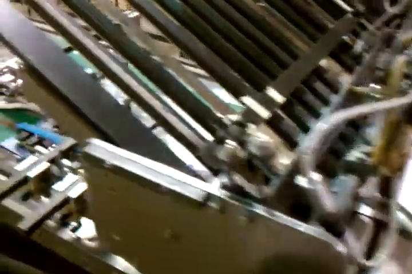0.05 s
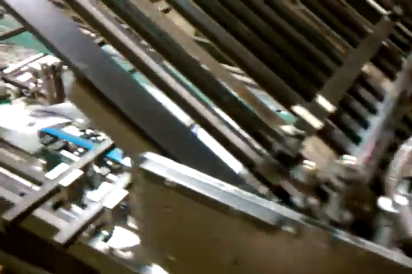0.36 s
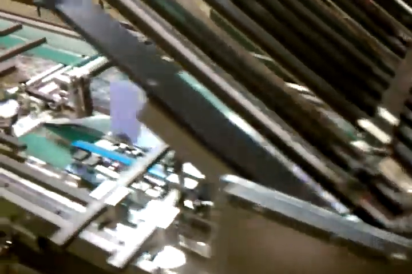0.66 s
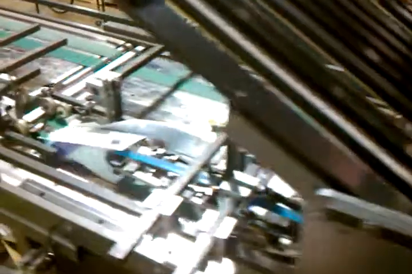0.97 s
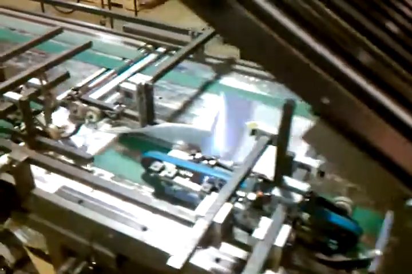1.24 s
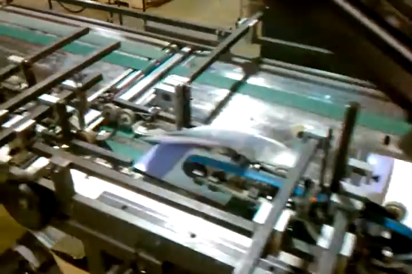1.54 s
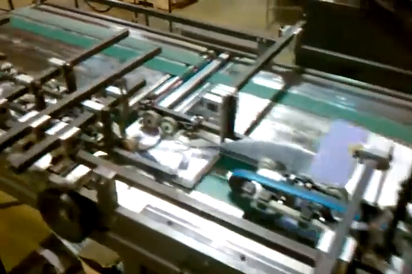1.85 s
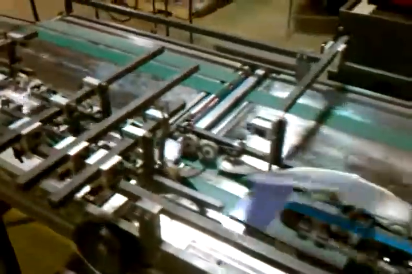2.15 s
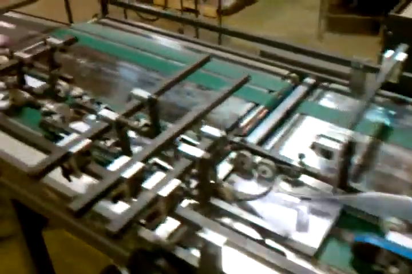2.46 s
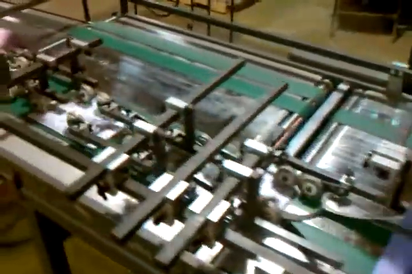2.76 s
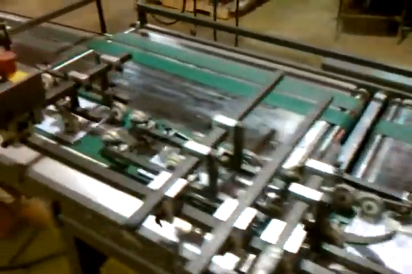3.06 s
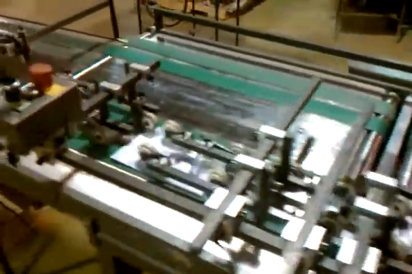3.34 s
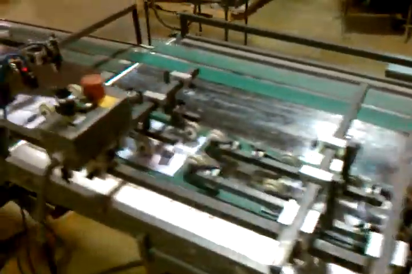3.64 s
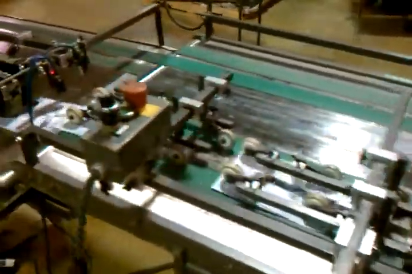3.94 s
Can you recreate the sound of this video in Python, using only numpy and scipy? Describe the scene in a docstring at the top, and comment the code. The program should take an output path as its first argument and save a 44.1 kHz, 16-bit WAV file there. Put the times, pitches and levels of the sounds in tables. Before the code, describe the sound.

A carton folding machine runs in a workshop, its belts rushing, rollers chattering and squealing, and gears whining. Sharp clacks, card swishes and snaps repeat steadily, loud and close at first, then softer as the microphone moves along.

```python
"""A carton folding and gluing machine runs in a workshop. From the start, belts rush, rollers
chatter and squeal, gears whine and a motor hums. Every two thirds of a second a flat card goes through:
its edge ticks on a guide, there is a dull knock, a folding hook lands with a rattling clack, the card
swishes under a bar and a flap snaps down. The first, nearest clacks overload the microphone;
then it drifts away along the line and the clacks grow quieter."""
import sys
import numpy as np
from scipy import signal
from scipy.io import wavfile

SR = 44100
rng = np.random.default_rng(int(sys.argv[2]) if len(sys.argv) > 2 else 0)


def unload_audio(sound):
    """Save the sound as a 16-bit wav file, at the path given as the first command line argument."""
    columns = np.transpose(np.atleast_2d(sound))
    # keep every value between -1 and 1, then stretch to whole-number steps
    steps = np.round(np.clip(columns, -1, 1) * 32767)
    wavfile.write(sys.argv[1], SR, steps.astype(np.int16))


N = 176400
T = np.arange(N) / SR


# The notes the folding hook rings with: pitch_hz, width_hz, relative_db
HOOK_BODY = [(615, 430, -8.5), (1014, 360, -2.5), (1820, 430, 1), (2263, 330, 1.5), (2615, 275, 1),
             (4200, 1600, -23)]
# Each strike of the hook: start_s, level_db, rattle_db, pitch_ratio
HOOK_STRIKES = [(0.1298, -3, -13, 0.96), (0.7939, -3.5, -25, 0.99), (1.4687, -5, -25, 1.067),
                (2.138, -9, -19, 0.906), (2.8084, -11, -17.5, .98), (3.4789, -12, -17, 0.96)]
def hook_clack(start_s, level_db, rattle_db, pitch_ratio):
    """The hook lands hard, grinds for a moment and rattles."""
    body = pitched(HOOK_BODY, pitch_ratio)
    hit = [(start_s, level_db)]
    grind = contacts(hit, body, attack_s=0.0011, hold_s=0.0026, decay_s=0.0033, grain=0.11)
    rattle = contacts([(start_s, rattle_db)], body, attack_s=0.00092, hold_s=0.015, decay_s=0.02, grain=1)
    return impacts(hit, body) + grind + rattle


# Each bounce of the hook: start_s, level_db
HOOK_BOUNCES = [(.1612, -8.5), (.8122, -10), (.8248, -15), (1.476, -17), (2.157, -19), (2.175, -17),
                (2.8135, -18.5), (3.275, -16), (3.494, -18)]
def hook_bounces():
    """The hook bounces back after a strike and rings again, more softly."""
    grind = contacts(HOOK_BOUNCES, HOOK_BODY, attack_s=0.00072, hold_s=0.0012, decay_s=0.0022, grain=0.38)
    return impacts(HOOK_BOUNCES, HOOK_BODY) + grind


# The notes a flap rings with: pitch_hz, width_hz, relative_db
FLAP_BODY = [(1430, 560, -2.5), (2470, 550, 1.5), (3560, 1300, -5.5), (4800, 1300, -7), (5840, 900, -5)]
# Each snap of a flap: start_s, level_db, pitch_ratio
FLAP_SNAPS = [(.032, -8.5, 1.12), (0.492, -9, 1), (1.1566, -10.5, 1.08), (1.8297, -10.5, 1.06),
              (2.5016, -7.5, 0.86), (3.168, -12, 0.95), (3.8397, -11.5, 1.02)]
def flap_snap(start_s, level_db, pitch_ratio):
    """A flap slaps down and stops at once."""
    body = pitched(FLAP_BODY, pitch_ratio)
    hit = [(start_s, level_db)]
    slap = contacts(hit, body, attack_s=0.0019, hold_s=0.0029, decay_s=0.0018, grain=0.24)
    return impacts(hit, body) + slap


# The tone of sliding card: pitch_hz, width_hz, relative_db
SWISH_BODY = [(1400, 1150, 2.8), (2200, 1080, 3), (3880, 860, -0.5), (6180, 220, -3)]
# Each slide: start_s, level_db
SWISHES = [(.318, -10), (.996, -12), (1.660, -12.5), (2.338, -18), (3.003, -11), (3.683, -14.5)]
def card_swishes():
    """Card rubs as it slides under the folding bar."""
    return contacts(SWISHES, SWISH_BODY, attack_s=0.0036, hold_s=0.0033, decay_s=0.025, grain=0.73)


# The high notes of a tick: pitch_hz, width_hz, relative_db
TICK_BODY = [(3670, 2000, -1.5), (5200, 94, 9), (6380, 1700, 0.5)]
# Each tick: start_s, level_db
TICKS = [(.030, -18), (.103, -18), (.698, -13.5), (.768, -16), (1.227, -17), (1.369, -16), (1.498, -23),
         (1.664, -20), (2.040, -18), (2.340, -15.5), (2.708, -17)]
def edge_ticks():
    """The edge of the card taps a guide."""
    return contacts(TICKS, TICK_BODY, attack_s=0.0018, hold_s=0.0025, decay_s=0.0036, grain=0.43)


# The mostly low notes of a knock: pitch_hz, width_hz, relative_db
KNOCK_BODY = [(260, 230, 7), (660, 1100, -8), (1700, 630, -9), (5500, 2400, -14)]
# Each knock: start_s, level_db
KNOCKS = [(.103, -20), (.767, -22), (.821, -15.5), (1.255, -18.5), (1.441, -18.5), (2.111, -24),
          (2.780, -20), (3.451, -20.5)]
def dull_knocks():
    """Short, dull bumps sound around the clacks."""
    return contacts(KNOCKS, KNOCK_BODY, attack_s=0.0024, hold_s=0.0024, decay_s=0.005, grain=0.51)


# How strong the belts and rollers are from low to high: pitch_hz, relative_db
BELT_TONE = [(25, -36), (40, -23), (52, -8.5), (80, -6), (140, -5), (240, -3.5), (400, -4), (600, -5.5),
             (900, -2), (1400, -1.5), (1950, 1.6), (2500, -6), (3100, -8.5), (3700, -6.5), (5000, -7),
             (6600, -9.5), (8500, -10)]
def belts(swings_db, level_db=-19.5, flutter_db=0.89, flutter_per_s=20):
    """Belts rush over their rollers, every band of the noise fluttering a little."""
    edges_hz = 22 * 2 ** (np.arange(27) / 3)  # three bands to an octave
    noise = rng.standard_normal((2, N))
    shared_flutter = 0.72 * drift(flutter_per_s)
    rush, power = 0, 0
    for k, (low, high) in enumerate(zip(edges_hz, edges_hz[1:])):
        hz = np.sqrt(low * high)
        band_filter = signal.butter(2, [low, high], "band", fs=SR, output="sos")
        band = from_db(at_hz(BELT_TONE, hz)) * signal.sosfilt(band_filter, noise[k % 2])
        power += np.mean(band ** 2)
        flutter = flutter_db * (shared_flutter + drift(flutter_per_s))
        rush += band * from_db(nearness(hz, swings_db) + flutter)
    return from_db(level_db) * rush / np.sqrt(power)


def roller_chatter(swing_db, level_db=-30, clicks_per_s=700, spread_db=3.5, ring_cycles=17.4):
    """Rollers and guides click at random, each part at its own pitch."""
    pitches = np.geomspace(260, 6600, 30)
    sizes = from_db(spread_db * np.minimum(rng.exponential(1, N), 4.5)) * rng.choice([-1, 1], N)
    clicks = sizes * (rng.random(N) < clicks_per_s / SR)
    part = rng.integers(0, len(pitches), N)
    rings = 0
    for k, hz in enumerate(pitches):
        width_hz = np.log(1000) / np.pi * hz / ring_cycles  # fades 60 dB in ring_cycles
        rings += from_db(at_hz(BELT_TONE, hz)) * resonate(clicks * (part == k), hz, width_hz)
    return from_db(level_db + swing_db) * rms_one(rings)


# The path of the roller's squeal: time_s, pitch_hz, level_db
SQUEAL = [(0, 1964, -38), (.65, 1925, -31), (.96, 1960, -29), (1.08, 1930, -31), (1.2, 2020, -24),
          (1.33, 2022, -41), (1.55, 2042, -33), (2.22, 1970, -33.5), (2.41, 2060, -30.5), (2.47, 2003, -29),
          (2.58, 2027, -31), (2.72, 1983, -28), (2.8, 2032, -44), (2.95, 1890, -43), (3.7, 1874, -37),
          (4, 1885, -29)]
def roller_squeal(jitter_hz=14.64, jitter_per_s=21.9):
    """A rubbed metal roller sings at an unsteady pitch."""
    hz, db = in_time(SQUEAL)
    phase = phase_of(hz + jitter_hz * drift(jitter_per_s))
    return from_db(db) * rms_one(np.sin(phase) * wobble(0.5, jitter_per_s))


# How the rail's note swells and fades: time_s, level_db
RAIL_LEVELS = [(0, -47), (1.3, -30.5), (1.55, -38), (2.05, -28.5), (2.3, -40), (2.68, -31), (3.1, -39),
               (3.3, -35), (3.52, -31), (3.7, -41)]
def guide_rail():
    """A guide rail sings as the belt rubs it."""
    level_db, = in_time(RAIL_LEVELS)
    return from_db(level_db) * wavering_tone(hz=1417, width_hz=38)


# The gear's side tones: cycles_per_turn, level_db
GEAR_TONES = [(11, -48), (24, -44.5), (25, -44.5), (27, -40), (29, -40), (31, -41), (33, -41.5), (36, -39)]
# The main tone, made by teeth meeting: time_s, level_db
TOOTH_LEVELS = [(0, -39), (.7, -26), (.92, -34), (2.3, -37.5), (2.5, -40), (3.05, -30.5), (3.3, -37.5),
                (4, -35)]
def gear_whine(turns_per_s=46, teeth=30):
    """Gear teeth meet in a steady whine, with side tones at other multiples of the turning rate."""
    turn = phase_of(turns_per_s * wobble(0.001623, 2.56))
    side_tones = 0
    for cycles, db in GEAR_TONES:
        side_tones += from_db(db) * np.sin(cycles * turn + rng.uniform(0, 2 * np.pi)) * wobble(0.51, 7.7)
    tooth_db, = in_time(TOOTH_LEVELS)
    tooth_tone = from_db(tooth_db) * np.sin(teeth * turn) * wobble(0.18, 8)
    return np.sqrt(2) * (side_tones + tooth_tone)


# The motor's three tones along the line: time_s, first_db, second_db, third_db
MOTOR_LEVELS = [(0, -43.5, -35.5, -32), (.7, -42.5, -32.5, -40), (1.35, -39.5, -35, -42),
                (1.7, -45.5, -39.5, -39), (2.0, -36, -35.5, -39), (2.3, -48.5, -42.5, -39.5),
                (3.1, -39.5, -44, -49), (3.55, -38.5, -34.5, -45.5), (4, -41, -35, -41)]
def motor_hum(pitch_hz=116.1):
    """The motor hums roughly at one, two and three times its lowest pitch."""
    phase = phase_of(pitch_hz * wobble(0.012, 4.65))
    hum = 0
    for k, db in enumerate(in_time(MOTOR_LEVELS), 1):
        tone = np.sin(k * phase + rng.uniform(0, 2 * np.pi))
        hum += from_db(db) * rms_one(tone * wobble(0.52, 14))
    return hum


# Steady low hums: pitch_hz, level_db, width_hz
LOW_HUMS = [(191.7, -46, 6.2), (276, -41, 8.9), (463, -43.5, 9.5), (686, -43.5, 7.6)]
# The high notes of the bearings: pitch_hz, level_db, width_hz
BEARING_WHINES = [(2612, -40, 1.2), (3421, -50, 7), (5638, -49, 4), (5868, -50, 4)]
def hums_and_bearings():
    """A few low notes hum steadily and the bearings whine faintly."""
    return sum(from_db(db) * wavering_tone(hz, width) for hz, db, width in LOW_HUMS + BEARING_WHINES)


def workshop_echo(sound, level_db=-8, fade_s=0.16):
    """Sound bounces off the walls and the machine's frame, blurring into a short tail."""
    age = T[:SR]
    tail = rng.standard_normal(SR) * from_db(-60 * age / fade_s) * (age > 0.004)
    return from_db(level_db) * signal.fftconvolve(sound, tail / np.sqrt(np.sum(tail ** 2)))[:N]


def impacts(rows, body, touch_s=0.0003, peak_boost_db=2.5):
    """Each hard touch is one short push that sets a body ringing."""
    blow = ring(np.exp(-T[:SR // 10] / touch_s), body)
    pushes = np.zeros(N)
    for start_s, db in rows:
        pushes[int(start_s * SR)] = from_db(db + peak_boost_db)
    return signal.fftconvolve(pushes, blow / np.abs(blow).max())[:N]


def contacts(rows, body, attack_s, hold_s, decay_s, grain):
    """Bursts of tiny slips rise, hold and die, ringing a body; more grain makes them grittier."""
    force = np.zeros(N)
    for start_s, db in rows:
        age = T - start_s
        rise = np.clip(1 + age / attack_s, 0, 1) ** 2
        fall = np.exp(-np.clip((age - hold_s) / decay_s, 0, 20))
        force += from_db(db) * rise * fall
    slips = rng.choice([-1, 1], N) * rms_one(np.exp(grain * rng.standard_normal(N)))
    return ring(force * slips, body)


def ring(force, body):
    """A force rings all the notes of a body; a noisy force keeps about the same power."""
    power = sum(from_db(db) ** 2 * np.pi * width / SR for hz, width, db in body)
    notes = [(-1) ** k * from_db(db) * resonate(force, hz, width) for k, (hz, width, db) in enumerate(body)]
    return sum(notes) / np.sqrt(power)


def resonate(force, hz, width_hz):
    """One ringing note: the wider it is, the sooner it dies."""
    r = np.exp(-np.pi * width_hz / SR)
    feedback = [1, -2 * r * np.cos(2 * np.pi * hz / SR), r * r]
    return signal.lfilter(np.array([1, 0, -1]) * (1 - r * r) / 2, feedback, force + 1e-18)


def pitched(body, ratio):
    """A body rings higher or lower depending on where it is struck."""
    return [(hz * ratio, width, db) for hz, width, db in body]


def nearness(hz, swings_db):
    """The change in level, in dB, at one pitch as the microphone moves."""
    places = np.log([110, 300, 1500, 5000])  # steady deep bass, then bass, middle, treble
    shares = [np.interp(np.log(hz), places, row) for row in np.eye(4)[1:]]
    return sum(share * swing for share, swing in zip(shares, swings_db))


def wavering_tone(hz, width_hz):
    """A tone that wavers at random, faster when it is wider."""
    phase = phase_of(np.full(N, hz))
    return drift(width_hz) * np.sin(phase) + drift(width_hz) * np.cos(phase)


def drift(per_s):
    """A smooth random curve that typically strays 1 from zero."""
    r = np.exp(-80 * np.pi * per_s / SR)
    slow = signal.lfilter([1], [1, -2 * r, r * r], rng.standard_normal(N // 40 + 2002))[2000:]
    return np.interp(np.arange(N) / 40, np.arange(len(slow)), rms_one(slow))


def wobble(depth, per_s):
    """A multiplier that wanders around 1."""
    return 1 + depth * drift(per_s)


def phase_of(hz):
    """The angle a wave has turned through so far."""
    return 2 * np.pi * np.cumsum(hz) / SR


def in_time(rows):
    """Join a table's points into one curve for each column after the time."""
    times, *columns = np.transpose(rows)
    return [np.interp(T, times, column) for column in columns]


def at_hz(rows, hz):
    """Look up the level at a pitch, spacing octaves evenly."""
    pitches, levels = np.transpose(rows)
    return np.interp(np.log(hz), np.log(pitches), levels)


def from_db(db):
    """Turn decibels into a multiplier."""
    return 10 ** (np.asarray(db) / 20)


def rms_one(x):
    """Scale to an average power of 1."""
    return x / np.sqrt(np.mean(x ** 2) + 1e-20)


# Running noise along the line (only swings from the average count): time_s, bass_db, middle_db, treble_db
RUNNING_LEVELS = [(0.0, -25, -19.5, -23), (0.44, -29, -19.5, -23), (0.79, -28.5, -19, -23),
                  (1.0, -29, -20, -23.5), (1.31, -26.5, -19.5, -22.5), (1.61, -29.5, -20.5, -24.5),
                  (3.02, -30, -23, -27.5), (3.4, -30, -23, -26), (4.0, -29, -24, -27.5)]
def scene():
    """The folding sounds and their echo, over the noise of the running machine."""
    hits = edge_ticks() + dull_knocks() + hook_bounces() + card_swishes()
    hits += sum(hook_clack(*row) for row in HOOK_STRIKES)
    hits += sum(flap_snap(*row) for row in FLAP_SNAPS)
    bass, middle, treble = [db - db.mean() for db in in_time(RUNNING_LEVELS)]
    running = belts([bass, middle, treble]) + roller_chatter(middle)
    drive = gear_whine() + motor_hum() + hums_and_bearings()
    squeals = roller_squeal() + guide_rail()
    return (hits + running + drive + squeals + workshop_echo(hits))[None]


def record(dry, edge_hz=7040, leak_stop_hz=8940, leak_db=-29.5, ceiling=0.74, sharpness=12, top_hz=15800):
    """The microphone loses the high treble except for a faint leak, and flattens the loudest peaks."""
    band = signal.sosfilt(signal.butter(22, edge_hz, fs=SR, output="sos"), dry)
    leak = signal.sosfilt(signal.ellip(10, 1, 80, leak_stop_hz, fs=SR, output="sos"), dry)
    leak = signal.sosfilt(signal.butter(8, edge_hz, "high", fs=SR, output="sos"), leak)
    heard = band + from_db(leak_db) * leak
    flattened = heard / (1 + np.abs(heard / ceiling) ** sharpness) ** (1 / sharpness)
    return signal.sosfilt(signal.cheby2(12, 70, top_hz, fs=SR, output="sos"), flattened)


dry = scene()
out = record(dry)
unload_audio(out)
```